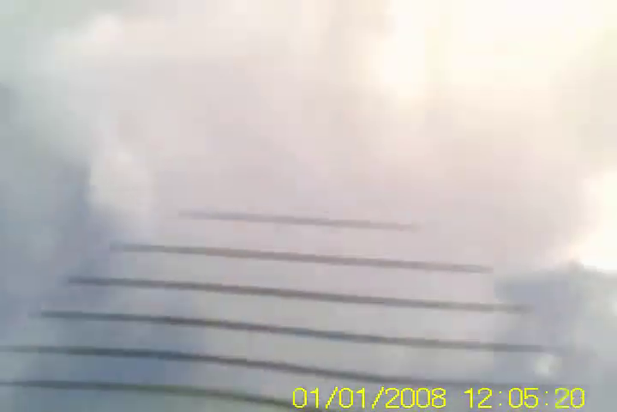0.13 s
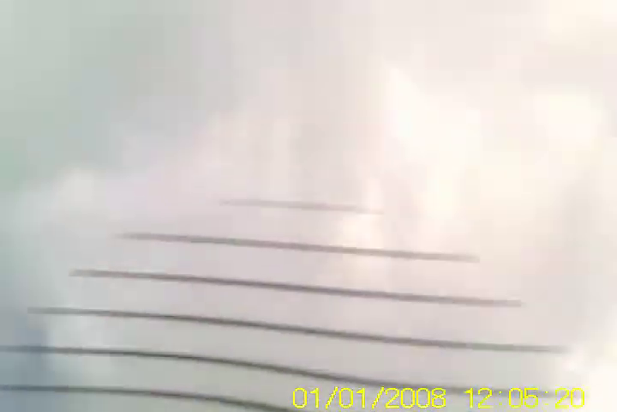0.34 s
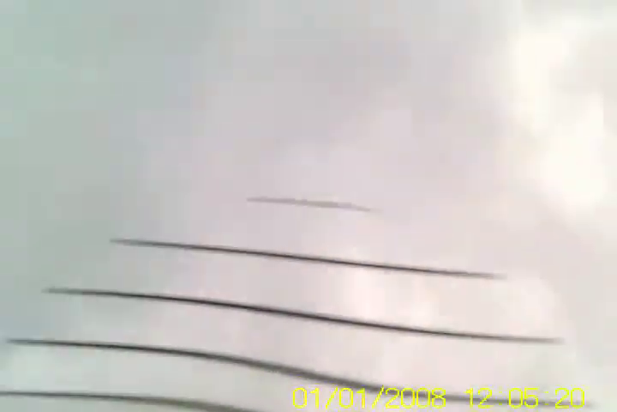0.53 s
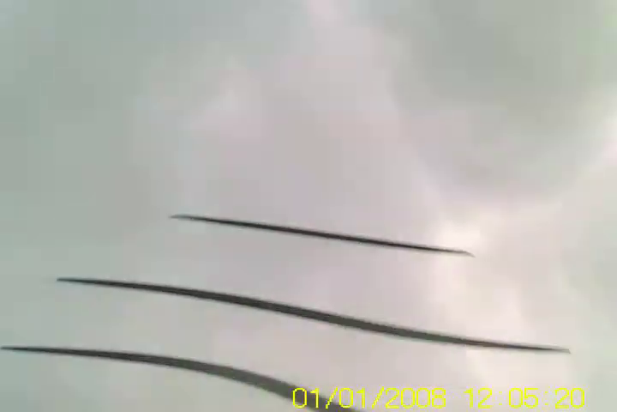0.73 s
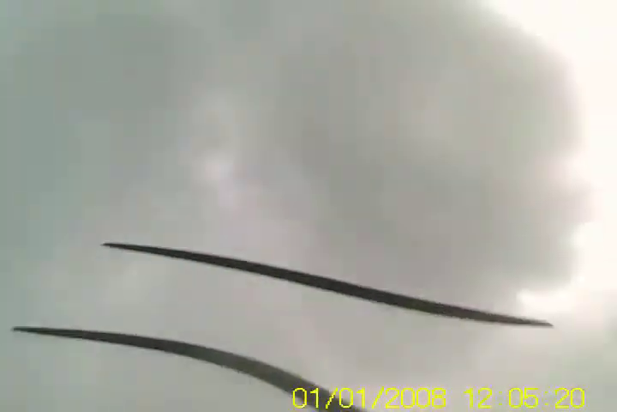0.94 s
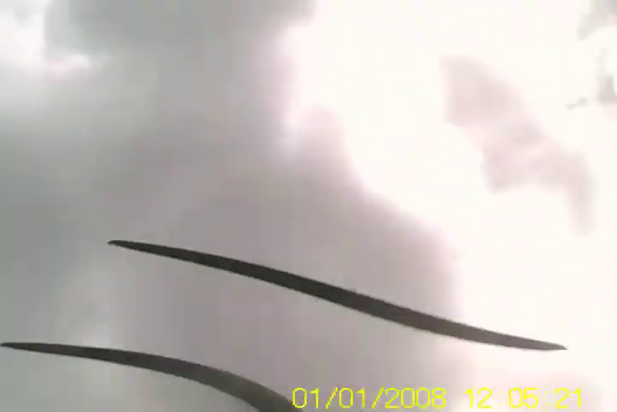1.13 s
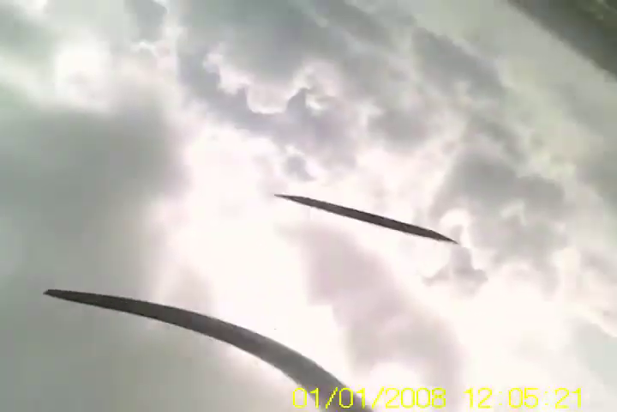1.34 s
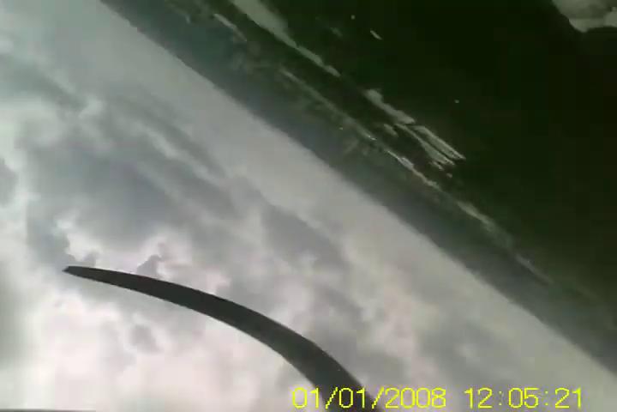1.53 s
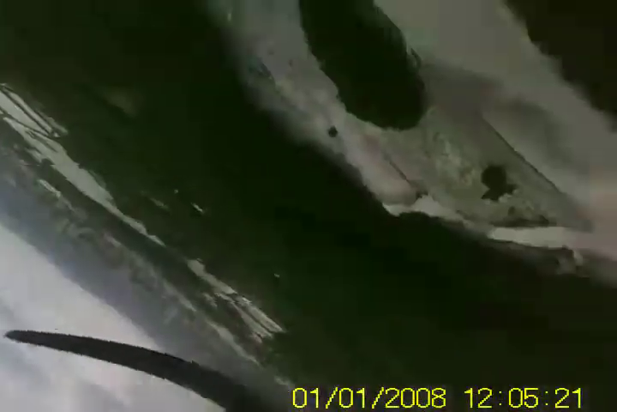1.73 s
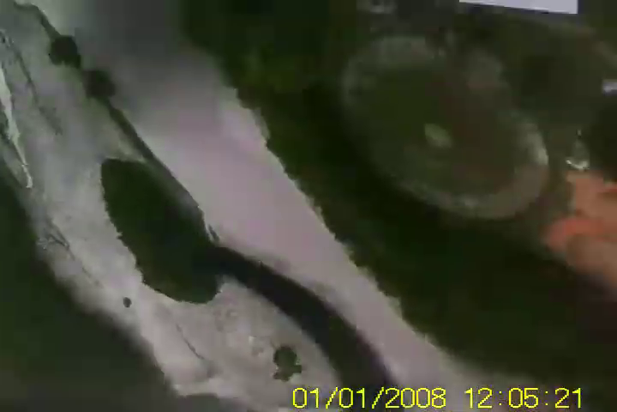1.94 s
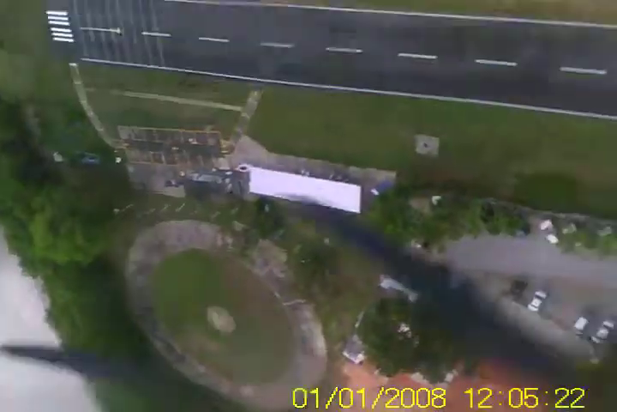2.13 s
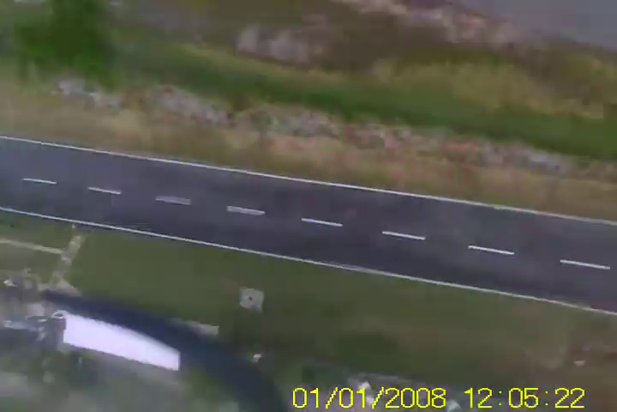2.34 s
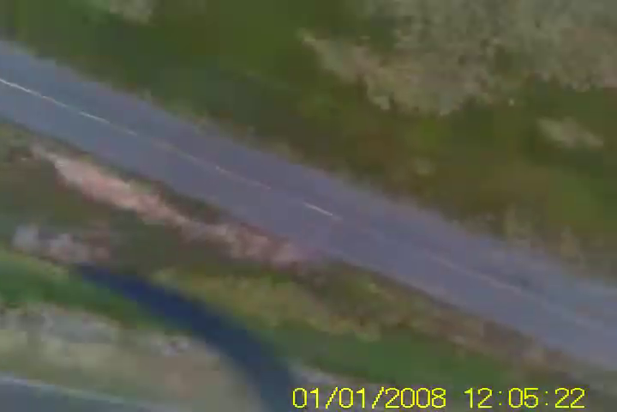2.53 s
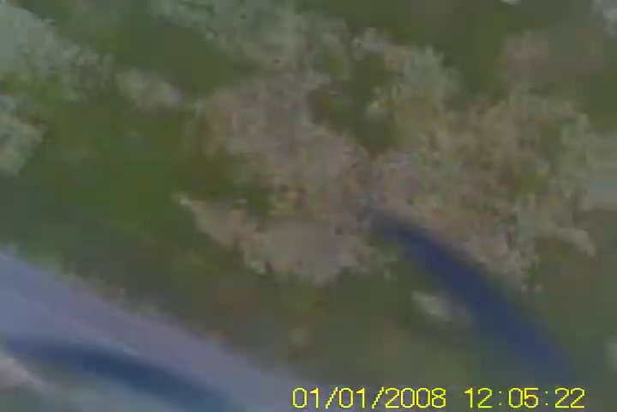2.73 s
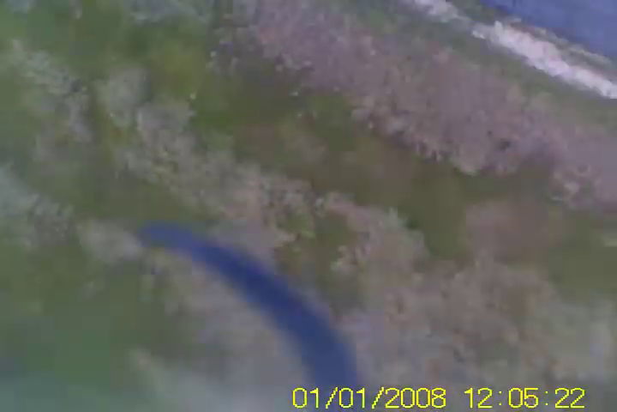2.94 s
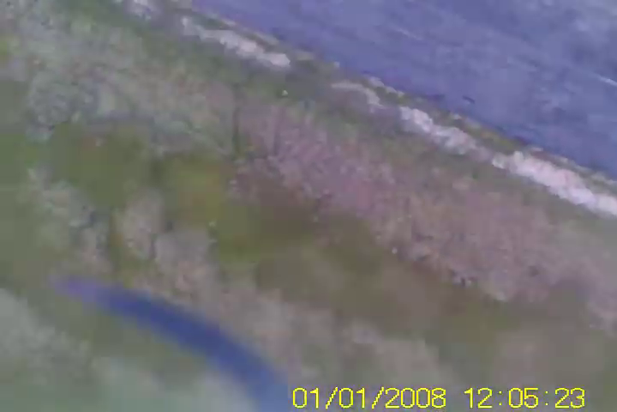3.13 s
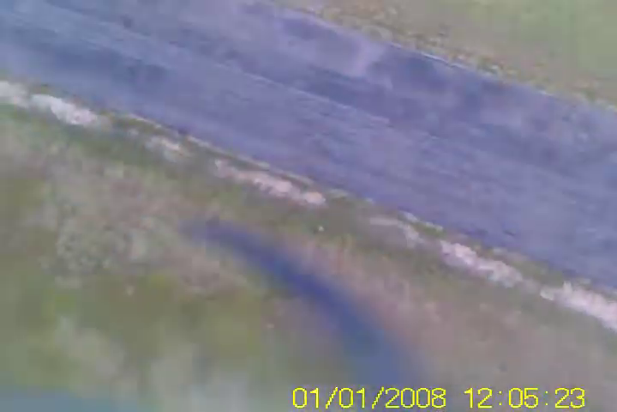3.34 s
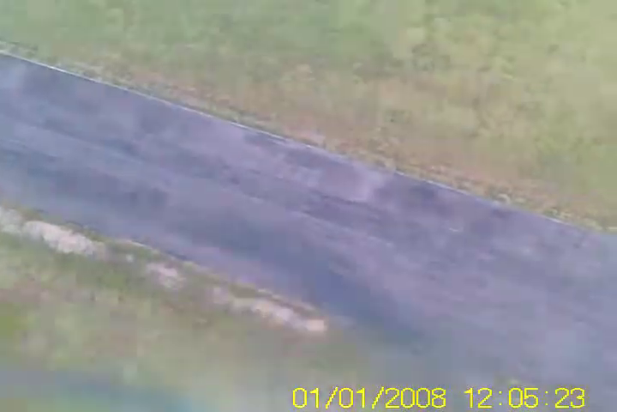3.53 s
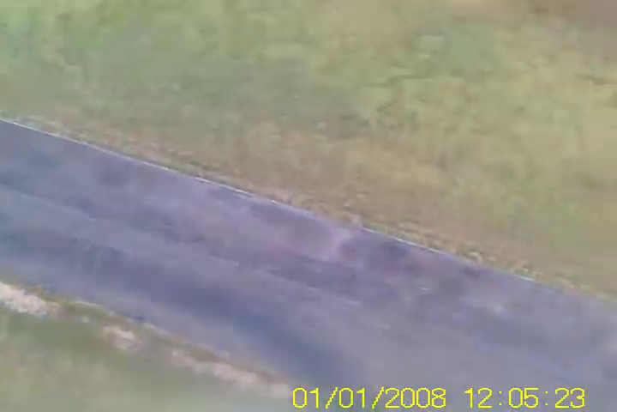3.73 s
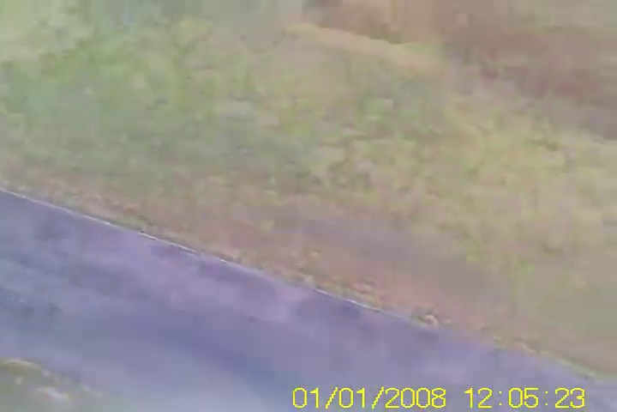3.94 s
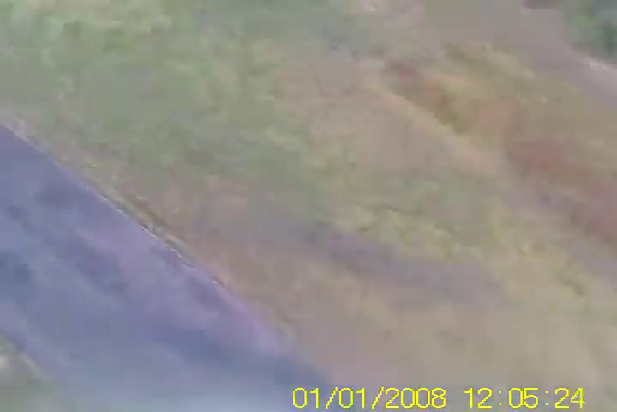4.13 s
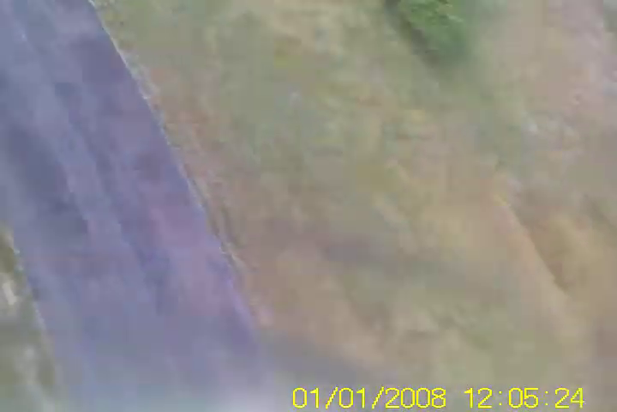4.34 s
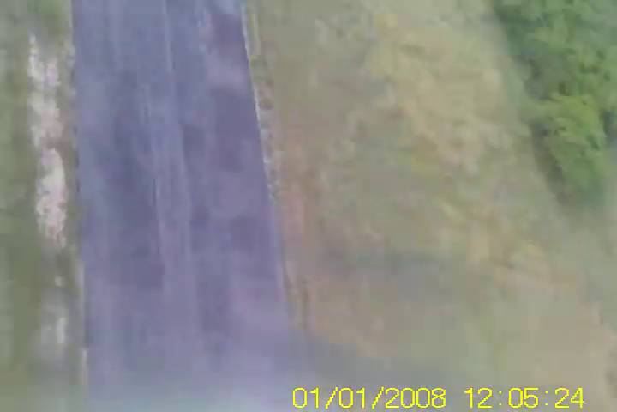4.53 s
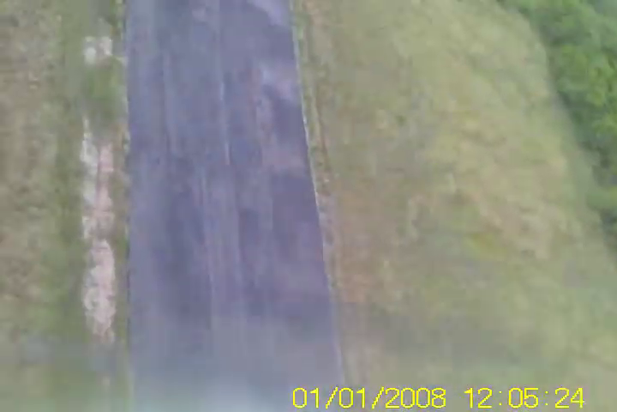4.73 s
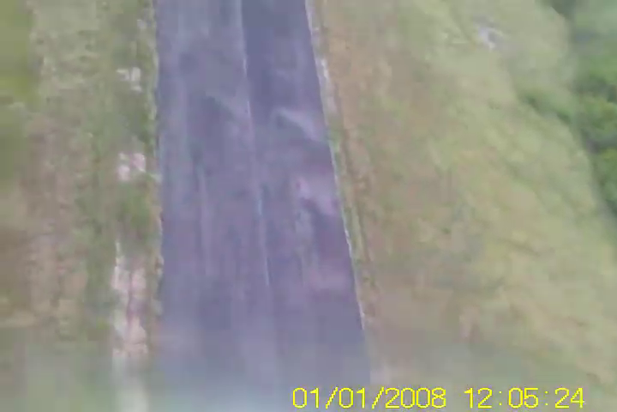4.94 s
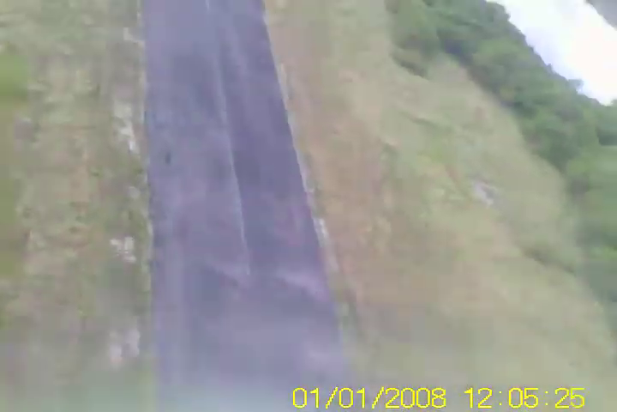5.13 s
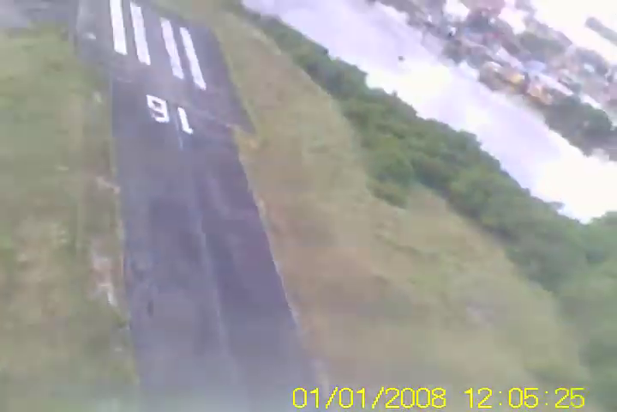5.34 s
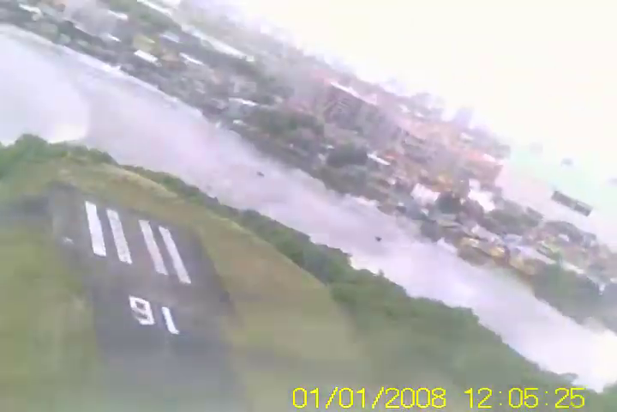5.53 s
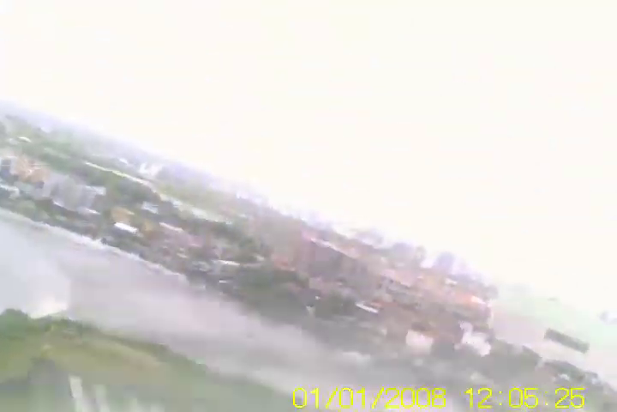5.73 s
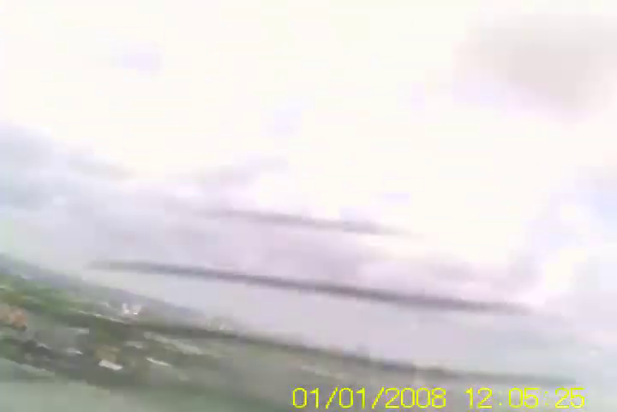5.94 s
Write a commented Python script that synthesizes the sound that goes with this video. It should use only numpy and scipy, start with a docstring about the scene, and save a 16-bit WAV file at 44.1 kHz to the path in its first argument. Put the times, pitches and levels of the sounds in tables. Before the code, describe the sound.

Onboard an electric model plane outdoors, heard through the airframe by a small, band-limited camera microphone. At 0 s a loud, rough, fast propeller drone with a fine buzz and a faint high electronic whine holds for about a quarter second, then the power is cut and the pitch slides steeply down until 1 s. From 1 to 3 s the propeller windmills ever more slowly, lowest around 2.7 s: a quiet pulsing flutter with loose knocks, a thin motor hum and soft air rush, plus isolated ticks near 2.5, 2.85 and 3.1 s. Wind rush and low buffeting grow from 2.7 s. From about 3.2 s the motor picks up, chugging and then growling, pitch climbing through 4 to 5 s. A burst of sharp mount rattles comes at 4.7-5.15 s. By 5.2 s it is a full, coarse drone lower than the opening, with brief buzz and whine, holding nearly steady to 6 s as the wind eases.

```python
"""Electric model plane, heard on its airframe

The throttle is cut, the propeller runs down and windmills in the rushing air, then speeds up again.
One shaft angle drives the unbalanced shaking, the motor tones, the throbbing noise and the clatter.
The mount buzzes and ticks, wind buffets the camera, and steady electronic whistles lie far below."""
import sys
import numpy as np
from scipy import signal
from scipy.fft import rfft, irfft
from scipy.io import wavfile

SR = 44100
rng = np.random.default_rng(int(sys.argv[2]) if len(sys.argv) > 2 else 0)


def unload_audio(sound):
    """Save the sound as a 16-bit wav file, at the path given as the first command line argument."""
    columns = np.transpose(np.atleast_2d(sound))
    # keep every value between -1 and 1, then stretch to whole-number steps
    steps = np.round(np.clip(columns, -1, 1) * 32767)
    wavfile.write(sys.argv[1], SR, steps.astype(np.int16))


N = 264600
TIME = np.arange(N) / SR

# Shaft speed. Each row: time in seconds, turns per second.
SHAFT_SPEED = [(0.0, 119.45), (0.25, 118.2), (0.55, 75.19), (0.75, 54.69), (1.0, 39.11), (1.3, 28.49),
               (1.8, 16.83), (2.2, 12.41), (2.7, 10.68), (3.05, 10.98), (3.45, 15.09), (3.8, 20.16),
               (4.3, 34.95), (4.85, 55.48), (5.15, 63.47), (5.4, 67.06), (5.75, 68.97), (6.0, 68.07)]


def shaft_angle():
    """Integrates the shaft speed to an angle in turns; whole turns put the heavy side at its peak."""
    turns = np.cumsum(curve(SHAFT_SPEED)) / SR
    return turns - np.interp(2.564, TIME, turns)  # zero angle at 2.564 s


# Sway of the airframe once a turn. Each row: frequency in Hz, level in dB at full throttle.
SWAY = [(16, -58), (20, -41.5), (26, -19), (32, -15), (38, -21), (48, -13.5), (55, -18.5), (63, -12.5),
        (69, -15), (95, -12), (118, -12.5)]
# Flexing three times a turn. Each row: frequency in Hz, level in dB at full throttle.
FLEX = [(33, -49.5), (72, -30), (110, -35), (132, -22), (158, -31.5), (186, -18.5), (210, -19.5),
        (255, -17.5), (360, -24.5)]


def shaking(turns, sway_coast_db=13, flex_coast_db=16.5, waver_db=1.34):
    """The unbalanced propeller shakes the plane once and three times a turn, less when coasting."""
    speed = curve(SHAFT_SPEED)
    once = amp(read(SWAY, speed) + effort(0, sway_coast_db))
    thrice = amp(read(FLEX, 3 * speed) + effort(0, flex_coast_db) + waver_db * drift(17))
    sway = once * np.cos(2 * np.pi * turns)
    flex = thrice * np.cos(2 * np.pi * (3 * turns + rng.random()))
    return np.sqrt(2) * (sway + flex)


# Motor tones before load and airframe response. Each row: multiple of shaft speed,
# level in dB at cruise speed, level in dB at full speed.
MOTOR_ORDERS = [(2, -38, -29.5), (4, -34, -35), (5, -30.5, -46), (6, -34.5, -45), (7, -39, -51),
                (9, -53.5, -36), (10, -33, -37), (11, -38.5, -31), (12, -29.5, -36.5), (13, -45.5, -31.5),
                (15, -38, -33), (16, -36, -50), (19, -36.5, -54), (20, -33, -61), (22, -47.5, -53)]
FULL_TURNS_PER_S = 110


def motor_tones(turns, waver_db=1.55, stumble_db=4.0, beat_db=14):
    """Blades and stator slots give tones under load; fourteen magnets hum even while windmilling."""
    full = np.interp(curve(SHAFT_SPEED), [CRUISE_TURNS_PER_S, FULL_TURNS_PER_S], [0, 1])
    load_db = effort(db_per_octave=14, coast_db=9)
    driven_hum = amp(-34 + load_db)
    idle_hum = amp(-46.5) * slower_than(16.3)
    hum_db = stumble_db * drift(40) + beat_db * heavy_side(turns)
    out = (driven_hum + idle_hum) * tone(turns, order=14, db=hum_db)
    for order, cruise_db, full_db in MOTOR_ORDERS:
        order_db = cruise_db + full * (full_db - cruise_db)
        out += tone(turns, order, order_db + load_db + waver_db * drift(32))
    return out


def tone(turns, order, db):
    """One multiple of the shaft speed, swelling as it crosses a resonance of the airframe."""
    hz = np.geomspace(10, SR / 2, 2000)
    response_db = np.interp(order * curve(SHAFT_SPEED), hz, airframe(hz))
    return np.sqrt(2) * amp(db + response_db) * np.cos(2 * np.pi * (order * turns + rng.random()))


# Low, middle and high noise of air and motor. Each holds: level in dB at 0 dB wind, dB per dB of wind,
# motor level in dB at cruise speed and full throttle, dB per octave of speed, drop in dB when coasting.
ROAR_LEVELS = (-27, 1.0, -34, 14, 16)
RASP_LEVELS = (-37.5, 1.7, -32, 4, 13)
HISS_LEVELS = (-61.5, 1.0, -51.5, 6.5, 14)


def rush(turns, memory=0.89, locked=0.68, locked_coasting=0.47, low_hz=230, gust_db=0.98, count=10):
    """Rough spots in the motor recur each turn, joined by fresh air noise; both throb with the blades."""
    lead = np.arange(-SR, 0)  # one second of steady turning before the start
    all_turns = np.r_[turns[0] + lead * SHAFT_SPEED[0][1] / SR, turns]
    grit = rng.standard_normal(len(all_turns))
    repeats = sum(memory ** k * grit[np.searchsorted(all_turns, turns - k)] for k in range(count))
    # share of the power that repeats
    share = np.interp(curve(THROTTLE), [0, 1], [locked_coasting, locked])
    fresh = rng.standard_normal(N)
    body = colour(np.sqrt(share) * evened(repeats) + np.sqrt(1 - share) * fresh, airframe)

    beats = heavy_side(turns) + 0.12 * np.cos(4 * np.pi * turns) + 0.16 * np.cos(8 * np.pi * turns)
    throb = np.maximum(1 + beats, 0.1)
    roar = band(body, low_hz, 886) / np.std(band(body, 420, 1008)) * loudness(*ROAR_LEVELS)
    rasp = evened(band(body, 950, 4440)) * loudness(*RASP_LEVELS)
    hiss = evened(band(body, 4070, 14000)) * loudness(*HISS_LEVELS)
    gusts = amp(gust_db * drift(98))
    return gusts * (roar * throb ** 1.03 + rasp * throb ** 1.32 + hiss * throb ** 0.77)


def heavy_side(turns, depth=0.27, lag_turns=0.055, fade_turns_per_s=18.4):
    """Once-a-turn beat of the slow propeller, a fraction of a turn behind its knock."""
    return depth * slower_than(fade_turns_per_s) * np.cos(2 * np.pi * (turns - lag_turns))


# Airstream, weak at the top of the loop, strong in the dive. Each row: time in seconds, level in dB.
WIND = [(0, -0.5), (.6, -13.5), (1.5, -8.5), (2.15, -11), (2.6, -7.5), (3, -4.5), (3.5, -1.5), (4, 0.5),
        (4.65, 2), (5.1, 1.5), (5.5, -4.5), (6, -11)]


def loudness(wind_db, wind_slope, motor_db, db_per_octave, coast_db):
    """Gain of a noise fed by both airstream and motor, added as powers."""
    wind = amp(wind_db + wind_slope * curve(WIND))
    motor = amp(motor_db + effort(db_per_octave, coast_db))
    return np.hypot(wind, motor)


def clatter(turns, level_db=-39.5, tight_turns_per_s=58, t60_s=0.031, size_db=3.0, low_hz=800):
    """The slow propeller knocks in its play four times a turn, hardest on its heavy side."""
    hits = np.flatnonzero(np.diff(np.floor(4 * turns + 0.15)))
    heavy_db = 6.0 * np.cos(2 * np.pi * turns[hits])
    hit_db = heavy_db + size_db * rng.uniform(-1.2, 1, len(hits))
    kicks = np.zeros(N)
    kicks[hits] = amp(hit_db) / np.sqrt(curve(SHAFT_SPEED)[hits])
    envelope = signal.lfilter([1], [1, -amp(-60 / (t60_s * SR))], kicks)
    knocks = band(colour(envelope * rng.standard_normal(N), airframe), low_hz, 3800)
    knocks /= np.std(knocks[2 * SR:4 * SR])
    return amp(level_db + curve(WIND)) * slower_than(tight_turns_per_s) * knocks


# Spells of mount buzz. Each row: start in seconds, end in seconds, level in dB.
BUZZ_SPELLS = [(0, .34, -51.5), (3.8, 5.1, -63), (5.12, 5.7, -51)]
# Spectrum of the buzz. Each row: frequency in Hz, relative level in dB.
BUZZ_COLOUR = [(500, -3), (2000, -4), (3500, 11.5), (5000, 5), (6800, 3.5), (8100, 11), (9000, -1),
               (10500, -17), (12000, -25.5)]


def buzz(turns, contact_turns=0.1):
    """In set spells the mount chatters: a noise burst once a turn, of uneven strength."""
    uneven = amp(2.5 * drift(60))
    chatter = np.exp(-(turns % 1) / contact_turns) * uneven * rng.standard_normal(N)
    return spells(BUZZ_SPELLS) * evened(colour(chatter, lambda hz: read(BUZZ_COLOUR, hz)))


# Ticks of the mount. Each row: start in seconds, relative level in dB, gain of the low knock in dB.
MOUNT_TICKS = [(.665, -46, -3), (0.6873, -41.5, 10), (1.0337, -40.5, 8), (1.061, -36, 5), (1.21, -37.5, 2),
               (1.51, -43, 10), (2.4842, -36, 12), (2.626, -45.5, -1), (2.8449, -32, 13),
               (2.8774, -34.5, 12), (3.1219, -28, 10), (3.9256, -33, 2), (4.062, -39, 12), (4.234, -34, -8),
               (4.6713, -31, 14), (4.7207, -24, 8), (4.78, -32, -7), (4.8152, -31, 6), (4.8265, -28, 5),
               (4.868, -25, 8), (4.889, -31.5, 7), (4.9364, -20.5, 5), (4.953, -31, 14), (4.993, -28, 12),
               (5.1431, -26, 13.5)]
# Spectrum of the ticks. Each row: frequency in Hz, relative level in dB.
TICK_COLOUR = [(60, 17.5), (300, 18.5), (900, 14), (1800, 0.5), (3500, 12.5), (5000, 0), (8500, 3),
               (10000, -10.5), (12000, -21)]


def ticks(t60_s=0.032, level_db=-8.5, knock_hz=2500, attack_s=0.0005):
    """Short scrapes of the mount, each a crisp decaying burst over a duller knock."""
    out = np.zeros(N)
    grain = colour(rng.standard_normal(N), lambda hz: read(TICK_COLOUR, hz))
    grain /= np.std(band(grain, 5000, 11000))
    knock = band(grain, 20, knock_hz)
    t = np.arange(SR // 10) / SR
    attack = 1 - np.exp(-t / attack_s)
    for start_s, db, knock_db in MOUNT_TICKS:
        first = round(start_s * SR)
        part = slice(first, first + len(t))
        scrape = grain[part] + (amp(knock_db) - 1) * knock[part]
        out[part] += attack * amp(db + level_db - 60 * t / t60_s) * scrape
    return out


# Wind buffeting the camera. Each row: time in seconds, level in dB.
BUFFET_LEVEL = [(0, -29.5), (.6, -40.5), (1.3, -41), (1.65, -45), (2.35, -43), (2.7, -38), (3.1, -31.5),
                (3.8, -27.5), (5.4, -28), (6, -39.5)]
# Spectrum of the buffeting. Each row: frequency in Hz, relative level in dB.
BUFFET_COLOUR = [(12, -27), (30, 9.5), (70, 0.5), (120, 0.5), (200, 1), (300, -16), (600, -45.5),
                 (3000, -99)]


def buffet():
    """Eddies round the camera: lumpy low noise that follows a level curve."""
    eddies = colour(rng.standard_normal(N), lambda hz: read(BUFFET_COLOUR, hz))
    lumps = amp(2.2 * drift(15))
    return amp(curve(BUFFET_LEVEL)) * evened(eddies * lumps)


# Spells of speed-controller whine. Each row: start in seconds, end in seconds, level in dB.
WHINE_SPELLS = [(0, .56, -64.5), (5.12, 5.65, -58)]


def controller_whine(pitch_hz=8027, waver_hz=15):
    """The controller chops the motor current at a high pitch that wavers slightly, whatever the speed."""
    turns = np.cumsum(pitch_hz + waver_hz * drift(50)) / SR
    return np.sqrt(2) * spells(WHINE_SPELLS) * np.sin(2 * np.pi * turns)


# Whistles of the camera's electronics. Each row: frequency in Hz, level in dB.
CAMERA_WHISTLES = [(5599, -83), (7402, -83), (9598, -88)]


def camera_whistles():
    """Faint steady sines from the camera's electronics."""
    return np.sqrt(2) * sum(amp(db) * np.sin(2 * np.pi * hz * TIME) for hz, db in CAMERA_WHISTLES)


# Broad response of the airframe. Each row: frequency in Hz, level in dB.
AIRFRAME_RESPONSE = [(20, 22), (60, 1.5), (150, 5), (300, -4), (600, -3.5), (900, -4.5), (1050, -9),
                     (1500, -9.5), (2200, -23), (3400, -23), (4600, -38), (8500, -46.5), (10000, -50),
                     (12000, -72.5)]
# Its resonances and notches. Each row: centre in Hz, half width in Hz, height in dB.
PANELS = [(165, 23, 2.5), (320, 41, 5.5), (453, 16, 1.5), (674, 28, 5), (867, 77, 8), (1315, 22, 1),
          (1527, 79, 4), (1726, 62, -5.5), (1880, 120, 5.5), (2344, 92, 8.5), (2413, 67, -17.5),
          (2720, 110, 4.5), (2940, 39, 7.5), (3206, 124, 7), (5470, 150, 4), (7820, 810, 5.5)]


def airframe(hz):
    """Response in dB of the body that carries the sound to the camera."""
    peaks_db = sum(db * np.exp(-((hz - f) / width) ** 2) for f, width, db in PANELS)
    return read(AIRFRAME_RESPONSE, hz) + peaks_db


# Pull of the motor. Each row: time in seconds, throttle from 0 to 1.
THROTTLE = [(0, 0.7), (.28, 0.86), (.38, 0.23), (.7, 0.03), (2.9, 0.1), (3.7, 0.6), (4.05, 1), (6, 0.9)]
CRUISE_TURNS_PER_S = 68


def effort(db_per_octave, coast_db):
    """Level in dB against powered cruise: lower when the shaft is slow and when the throttle is off."""
    octaves = np.minimum(np.log2(curve(SHAFT_SPEED) / CRUISE_TURNS_PER_S), 0)
    return db_per_octave * octaves - coast_db * (1 - curve(THROTTLE))


def slower_than(turns_per_s, steep=4):
    """Near one while the shaft turns slower than this, near zero when much faster."""
    return 1 / (1 + (curve(SHAFT_SPEED) / turns_per_s) ** steep)


def spells(rows, rise_db_per_s=130, fall_db_per_s=175):
    """Gain of a sound that swells, holds from start to end, and dies away."""
    gain = np.zeros(N)
    for start, end, db in rows:
        before_s, after_s = np.maximum(start - TIME, 0), np.maximum(TIME - end, 0)
        gain += amp(db - rise_db_per_s * before_s - fall_db_per_s * after_s)
    return gain


def amp(db):
    """Decibels to gain."""
    return 10 ** (np.asarray(db) / 20)


def evened(x):
    """Scales to an rms of one."""
    return x / np.sqrt(np.mean(x ** 2) + 1e-20)


def curve(rows):
    """A time table, interpolated at every sample."""
    return np.interp(TIME, *np.transpose(rows))


def read(points, hz):
    """A spectrum in dB, joined on a log-frequency axis."""
    f, db = np.transpose(points)
    return np.interp(np.log(hz + 1), np.log(f), db)


def colour(x, response):
    """Causal minimum-phase filter with the given dB response."""
    size = 4096
    log_gain = np.log(amp(response(abs(np.fft.fftfreq(size, 1 / SR)))))
    taps = np.fft.ifft(np.exp(np.conj(signal.hilbert(log_gain)))).real
    return signal.oaconvolve(x, taps[:size // 2])[:len(x)]


def band(x, lo_hz, hi_hz):
    """Keeps one band, with steep soft edges."""
    hz = np.fft.rfftfreq(len(x), 1 / SR)
    below = lambda edge_hz: 1 / (1 + (hz / edge_hz) ** 16)
    return irfft(rfft(x) * (below(hi_hz) - below(lo_hz)), len(x))


def drift(rate_hz):
    """Random wander of rms one, from a tenth of the rate up to the rate."""
    return evened(band(rng.standard_normal(N), rate_hz / 10, rate_hz))


def scene():
    """Sums all sources; everything that turns follows the angle of one shaft."""
    turns = shaft_angle()
    plane = shaking(turns) + motor_tones(turns) + rush(turns) + clatter(turns)
    mount = buzz(turns) + ticks()
    background = buffet() + controller_whine() + camera_whistles()
    return (plane + mount + background)[None]


def record(dry, edge_hz=11500):
    """The small camera's band limit: a linear-phase low-pass."""
    taps = signal.firwin(101, edge_hz, window=("kaiser", 8), fs=SR)
    return signal.oaconvolve(dry, taps[None], "same")


dry = scene()
out = record(dry)
unload_audio(out)
```